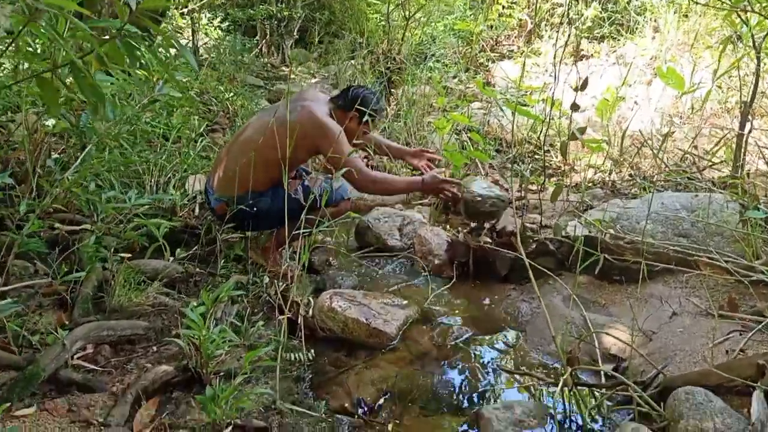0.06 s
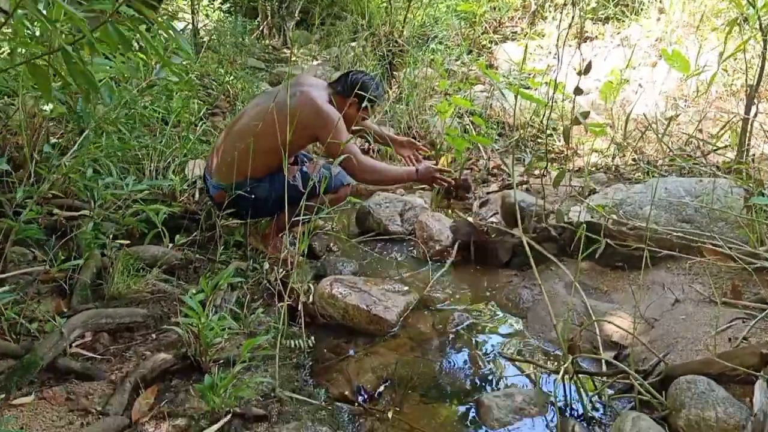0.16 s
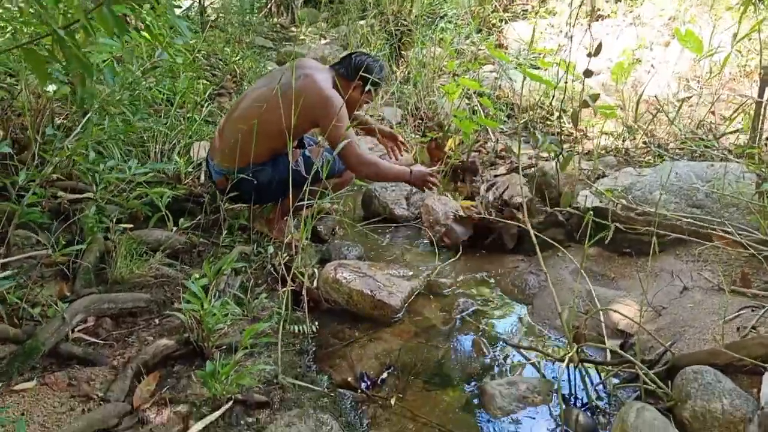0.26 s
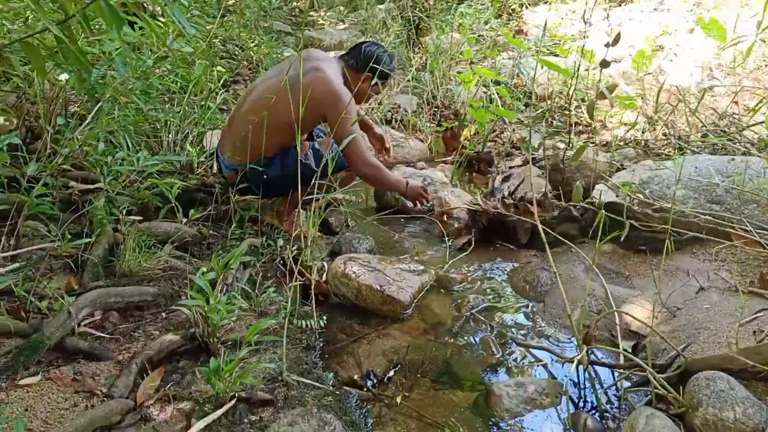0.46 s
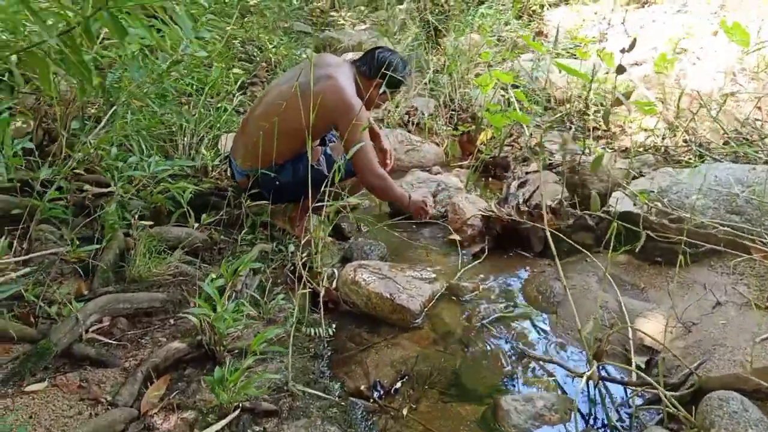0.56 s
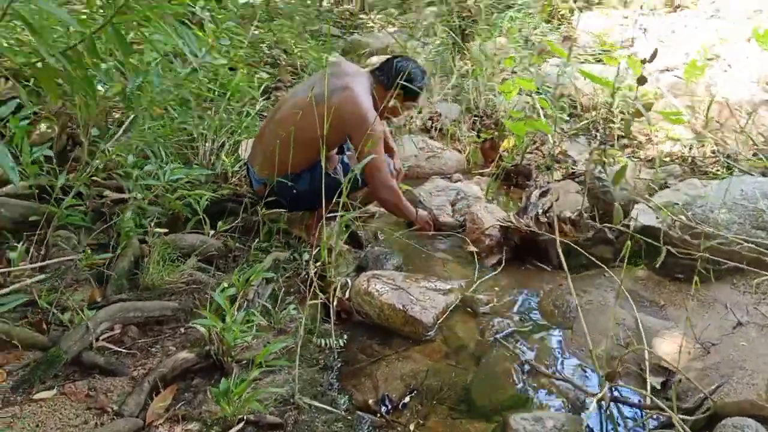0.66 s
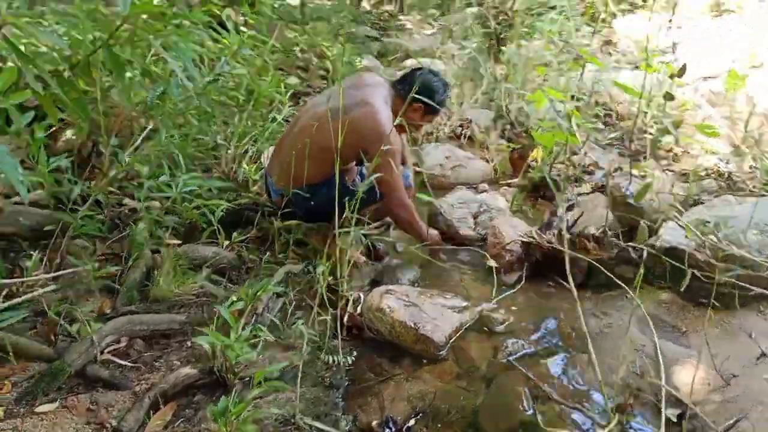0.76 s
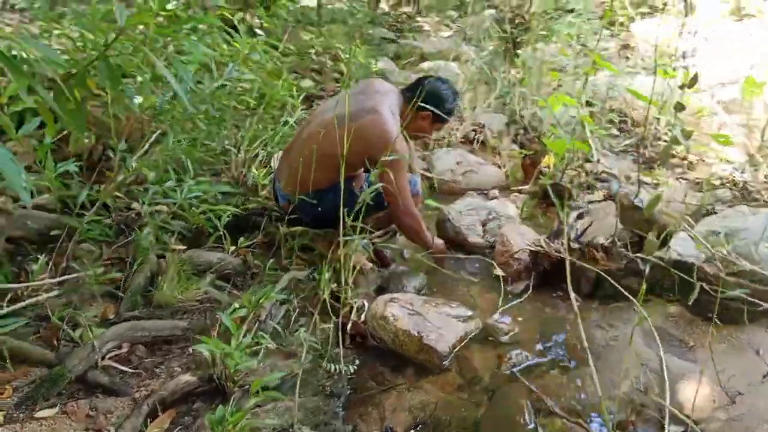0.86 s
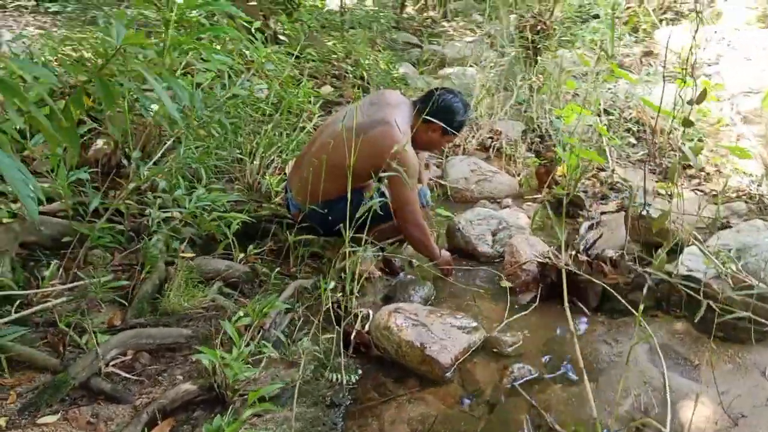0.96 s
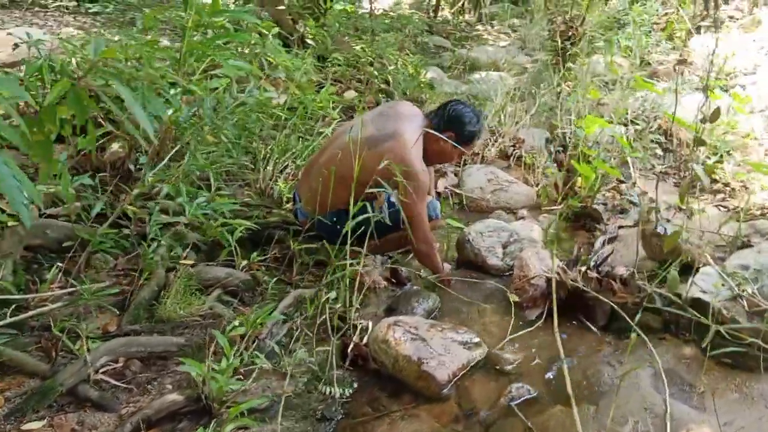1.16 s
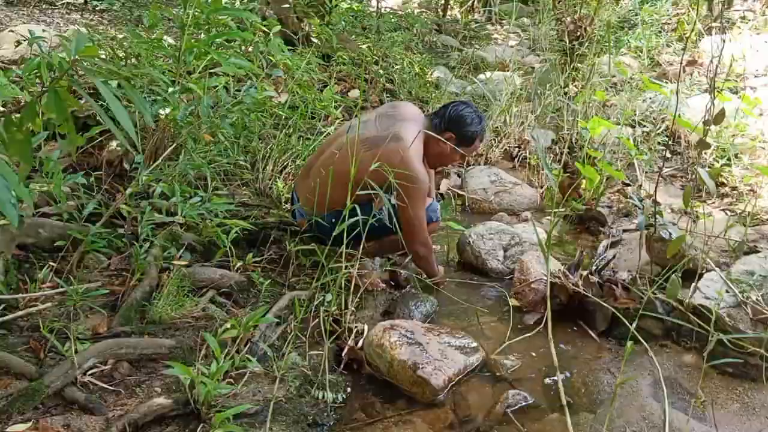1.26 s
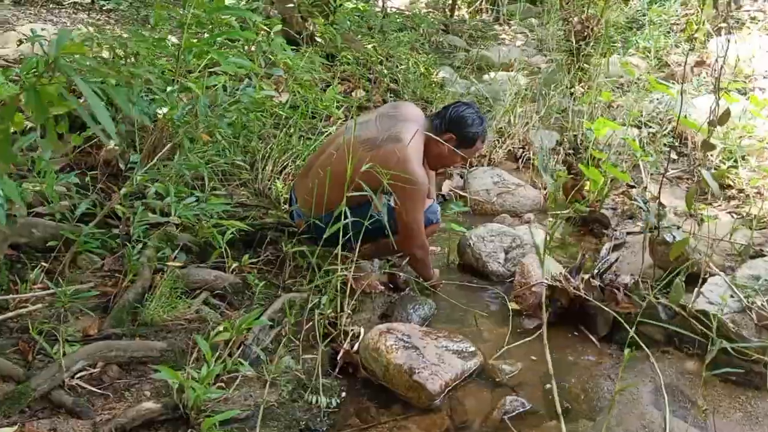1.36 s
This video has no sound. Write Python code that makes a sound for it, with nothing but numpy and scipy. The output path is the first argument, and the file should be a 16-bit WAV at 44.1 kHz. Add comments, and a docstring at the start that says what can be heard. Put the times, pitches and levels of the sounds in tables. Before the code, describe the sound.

Shallow forest stream running softly, with an early hollow stone knock, light ticks and a short splash

```python
"""A small forest stream runs steadily: a low gurgle of bubbles, and the hiss of a riffle off to the left.
Coloured noise makes the rush and short rings that rise in pitch make the bubbles, heard by a stereo pair.
Someone sets a stone down in the shallows: a brief splash of random droplets swells and the stone ticks
against others. It lands with one hollow knock of damped modes and grit, with an early stereo spread;
rocks close by return discrete echoes, and the banks and trees a decaying wash of noise."""
import sys
import numpy as np
from scipy import signal
from scipy.fft import rfft, irfft
from scipy.io import wavfile
from scipy.ndimage import uniform_filter1d

SR = 44100
rng = np.random.default_rng(int(sys.argv[2]) if len(sys.argv) > 2 else 0)


def generate_wav(sig):
    """Save sig (samples, or channels by samples) to the path in sys.argv[1] as 16-bit PCM at SR."""
    pcm = np.round(np.clip(np.atleast_2d(sig).T, -1, 1) * 32767).astype(np.int16)
    wavfile.write(sys.argv[1], SR, pcm)


N = 61739  # samples, 1.4 s

# Spectrum shape of the running water: (frequency [Hz], relative density [dB per Hz])
STREAM_SPECTRUM = [(24, -74), (40, -51), (67, -19.5), (124, -9.5), (207, -4), (239, -6), (277, -2),
                   (321, -4.5), (381, -5.5), (593, -2.5), (1330, -7.5), (2280, -5.5), (3460, -15.5),
                   (5130, -17.5), (8370, -22.5), (11500, -31.5), (14000, -39)]
STREAM_DB, SURGE_DB, FLICKER_DB = -42.5, 0.35, 1.16  # flicker is for the lowest band
# Lean of the water towards the left: (frequency [Hz], left minus right [dB])
LEFT_LEAN = [(60, -1), (110, -0.5), (200, 1), (380, -1), (700, 2.5), (1290, 0.5), (2380, 2.5), (4390, 5),
             (6000, 7), (8500, -5), (15000, 2)]
# Likeness of the two sides for water from all around: (frequency [Hz], correlation [0-1])
SIDE_LIKENESS = [(60, 0.84), (140, 0.88), (290, 0.81), (640, 0.39), (1200, 0)]
RIFFLE_SHARE = 0.31  # part of the rush's power that comes straight from the left
RIFFLE_LEAD_S = 0.0003516  # left before right, about 12 cm of path

# Families of small bubbles in the stream:
# (lowest pitch [Hz], highest pitch [Hz], rate [per s], ring to -60 dB [cycles], family level [dB])
BUBBLE_FAMILIES = [(328.7, 960, 220, 39, -56), (1760, 2890, 560, 23, -54.5), (3160, 7200, 710, 6, -60)]
BUBBLE_GLIDE, BUBBLE_SPREAD_DB = 0.33, 2.2  # glide: fraction the pitch rises over one ring

# Swell of the water's bright band: (time [s], level [dB])
BABBLE_SWELL = [(0, 0.5), (0.101, -0.5), (0.3, 1), (0.7, 1), (0.85, 1.9), (1.04, 2.6), (1.11, -0.5),
                (1.25, -1), (1.33, 0.5)]
BABBLE_HZ, BABBLE_HALF_WIDTH_HZ = 2400, 500

# Spectrum shape of the splash: (frequency [Hz], relative density [dB per Hz])
SPLASH_SPECTRUM = [(300, -32), (700, 1.5), (1400, -3.5), (2100, 5.5), (2900, 2), (3600, 2.5), (4600, -7),
                   (6500, -6.5), (10000, -17), (14000, -21)]
SPLASH_START_S, SPLASH_ATTACK_S, SPLASH_END_S, SPLASH_RELEASE_S = 0.13, 0.038, 0.21, 0.02
SPLASH_DB, DROPS_PER_S = -41.5, 14000  # droplets on each side

# Touches of the stone on others before it lands: (time [s], pitch [Hz], level [dB])
STONE_TICKS = [(0.1328, 2750, -38), (0.1405, 2840, -33), (0.1924, 2520, -27), (0.1949, 2650, -33),
               (0.2014, 2720, -26)]
# Spectrum shape of the gritty edge of each touch: (frequency [Hz], relative density [dB per Hz])
TICK_GRIT_SPECTRUM = [(1500, -25), (2700, 16), (4500, -18), (7000, -25), (12000, -40)]
TICK_T60_S, TICK_GRIT_DB = 0.009, -12.5  # grit level goes on top of the touch's level
TICK_PAN_DB, KNOCK_PAN_DB = 4, 1.3  # left minus right

# Early stereo spread (first row), then echoes from the nearest rocks:
# (delay [s], left gain [signed ratio], right gain [signed ratio])
SPREAD_AND_ECHOES = [(.00101, 0.095, -0.067), (.00231, -0.17, 0.18), (.00433, -0.47, -0.63),
                     (.00525, 0.17, -0.088), (.00631, -0.12, -0.035), (.00738, -.06, -.22),
                     (.0123, 0.031, -0.2), (.0141, -0.23, -0.1)]

# Ringing of the stone and the hollow under it:
# (frequency [Hz], level before the knock's gain [dB], decay to -60 dB [s])
KNOCK_MODES = [(394, -32, 0.013), (572, -20.5, 0.036), (694.4, -24, 0.14), (751, -0.5, 0.01),
               (1320, -20.5, 0.0099)]
KNOCK_S, KNOCK_GAIN_DB, KNOCK_RISE_S = .20825, 11, 0.0014
# How well the cushioned stone radiates its ringing: (frequency [Hz], gain [dB])
STONE_RADIATION = [(40, -17), (90, -21), (160, -4), (300, -4.5), (1250, -3), (1480, -10), (3000, -10)]
# Spectrum shape of grit crushed at the contact: (frequency [Hz], relative density [dB per Hz])
CRUSHED_GRIT_SPECTRUM = [(300, -22), (1400, 12), (2000, 16), (2600, -10), (4000, -19), (12000, -48)]
CRUSHED_GRIT_DB, CRUSHED_GRIT_T60_S = -38, 0.025
# Spectrum shape of the diffuse echo of banks and trees: (frequency [Hz], relative density [dB per Hz])
BANKS_SPECTRUM = [(60, -50), (150, -38), (400, -14), (560, -4), (720, -7), (1000, -20), (1500, -19),
                  (3000, -30), (12000, -62)]
BANKS_DELAY_S, BANKS_T60_S, BANKS_DB = 0.009, 0.064, -31.5  # about 3 m of extra path
FOREST_T60_S, FOREST_DB = 0.35, -38

# Larger bubbles that stand out: (time [s], pitch [Hz], level [dB])
LARGE_BUBBLES = [(0.303, 2070, -38), (0.318, 350, -50), (0.436, 378, -42), (0.445, 142, -42.5),
                 (0.819, 495, -44), (0.882, 305, -41), (1.256, 550, -40), (1.305, 2260, -42),
                 (1.332, 272, -43)]
GURGLE_RISE_S, GURGLE_T60_S, GURGLE_GLIDE = 0.0036, 0.07, 0.14

TOP_HZ = 14100  # the recorder's upper limit
LEFT_RIGHT_SIGN = np.array([[1], [-1]])


def undb(db):
    """Decibels to amplitude gain."""
    return 10 ** (np.asarray(db) / 20)


def unit(x):
    """Scale to rms 1."""
    return x / np.sqrt(np.mean(x ** 2))


def at_hz(table, hz):
    """Read a table on a log-frequency axis."""
    table_hz, value = np.array(table, float).T
    return np.interp(np.log(np.maximum(hz, 1)), np.log(table_hz), value)


def bins():
    """Frequencies of the spectrum in Hz."""
    return np.arange(N // 2 + 1) * SR / N


def equalize(x, table):
    """Filter by a table of gain in dB against frequency."""
    return irfft(rfft(x) * undb(at_hz(table, bins())), N)


def colour(x, table):
    """Give noise a spectrum shape, at rms 1."""
    return unit(equalize(x, table))


def delay(x, seconds):
    """Delay by a phase slope, which allows fractions of a sample."""
    return irfft(rfft(x) * np.exp(-2j * np.pi * bins() * seconds), N)


def since(moment_s):
    """Seconds since a moment, zero before it."""
    return np.maximum(np.arange(N) / SR - moment_s, 0)


def fade(age, t60):
    """Exponential decay by 60 dB in t60 seconds."""
    return np.exp(-np.log(1000) * age / t60)


def rising_ring(age, hz, glide, life):
    """Sine whose pitch rises by the fraction glide over life seconds, as it fades."""
    return np.sin(2 * np.pi * hz * age * (1 + glide * age / life / 2)) * fade(age, life)


def walk(rate):
    """Smooth random wander of rms near 1, from rate random steps per second."""
    k = max(int(SR / rate), 2)
    steps = np.repeat(rng.standard_normal(N // k + 1), k)
    return unit(uniform_filter1d(uniform_filter1d(steps, k), k)[:N])


def from_left(x):
    """A sound from the left reaches the right side a little later."""
    return np.array([x, delay(x, RIFFLE_LEAD_S)])


def lean(x):
    """Tilt the water's sound between left and right, by frequency."""
    return irfft(rfft(x) * undb(LEFT_RIGHT_SIGN * at_hz(LEFT_LEAN, bins()) / 2), N)


def rush(count=20):
    """Countless merged bubbles, all around and from the riffle; the flow surges and each band flickers."""
    mid, side, riffle = rng.standard_normal((3, N))
    alike = at_hz(SIDE_LIKENESS, bins())
    # the mid and side weights set how alike left and right are
    shared = rfft(mid) * np.sqrt((1 + alike) / 2)
    opposed = LEFT_RIGHT_SIGN * rfft(side) * np.sqrt((1 - alike) / 2)
    around = shared + opposed
    water = np.sqrt(1 - RIFFLE_SHARE) * around + np.sqrt(RIFFLE_SHARE) * rfft(from_left(riffle))
    # overlapping triangular bands, evenly spaced in log frequency
    place = np.interp(np.log(bins() + 1), np.log([60, TOP_HZ]), [0, count - 1])
    out = 0
    for k in range(count):
        flicker_db = FLICKER_DB * (1 - k / count / 2) * walk(49.5)  # milder in higher bands
        band = irfft(water * np.maximum(1 - abs(place - k), 0), N)
        out = out + undb(flicker_db) * band
    return colour(out, STREAM_SPECTRUM) * undb(STREAM_DB + SURGE_DB * walk(4.9))


def bubbles(low_hz, high_hz, rate, cycles, db):
    """Single bubbles ring briefly and rise in pitch as they near the surface."""
    out = np.zeros((2, N))
    for when, pitch, size, where in rng.random((int(rate * N / SR), 4)):
        hz = low_hz * (high_hz / low_hz) ** pitch
        start = int(when * N)
        life = cycles / hz
        age = np.arange(min(int(life * SR), N - start)) / SR
        right_lag = RIFFLE_LEAD_S * (where + .5)
        age = np.maximum(age - np.array([[0], [right_lag]]), 0)
        onset = 1 - np.exp(-age * hz)
        loudness = undb(-BUBBLE_SPREAD_DB * np.log(1 - .97 * size))  # a few stand out
        ring = rising_ring(age, hz, BUBBLE_GLIDE, life)
        out[:, start:start + age.shape[1]] += ring * onset * loudness
    return unit(out) * undb(db)


def babble(water):
    """The bright band of the running water swells and sinks."""
    band = irfft(rfft(water) / (1 + ((bins() - BABBLE_HZ) / BABBLE_HALF_WIDTH_HZ) ** 4), N)
    swell_db = np.interp(np.arange(N) / SR, *np.array(BABBLE_SWELL).T)
    return water + band * (undb(swell_db) - 1)


def splash():
    """Spray thickens as the stone pushes into the water and dies as it lands."""
    attack = np.sqrt(np.minimum(since(SPLASH_START_S) / SPLASH_ATTACK_S, 1))
    release = np.exp(-since(SPLASH_END_S) / SPLASH_RELEASE_S)
    drops = rng.standard_normal((2, N)) * (rng.random((2, N)) < DROPS_PER_S / SR)
    return colour(drops, SPLASH_SPECTRUM) * attack * release * undb(SPLASH_DB)


def at_the_stone(x, pan_db):
    """A sound at the stone, with its early stereo spread and then the echoes from the nearest rocks."""
    returns = sum(np.array([[left], [right]]) * delay(x, s) for s, left, right in SPREAD_AND_ECHOES)
    return (x + returns) * undb(LEFT_RIGHT_SIGN * pan_db / 2)


def ticks():
    """The stone grazes its neighbours on the way down: each touch is a short ring with a gritty edge."""
    out = 0
    for s, hz, db in STONE_TICKS:
        age = since(s)
        grit = undb(TICK_GRIT_DB) * colour(rng.standard_normal(N), TICK_GRIT_SPECTRUM)
        touch = np.sin(2 * np.pi * hz * age) + grit
        out = out + undb(db) * touch * fade(age, TICK_T60_S) * (1 - np.exp(-age * hz))
    return at_the_stone(out, TICK_PAN_DB)


def soft_push(age):
    """A cushioned contact builds up smoothly from zero."""
    return 1 - np.exp(-(age / KNOCK_RISE_S) ** 2)


def knock():
    """A cushioned blow rings heavily damped modes and crushes a little grit; the nearby rocks answer."""
    age = since(KNOCK_S)
    ring = 0
    for hz, db, t60 in KNOCK_MODES:
        ring = ring + undb(db + KNOCK_GAIN_DB) * np.sin(2 * np.pi * hz * age) * fade(age, t60)
    grit = undb(CRUSHED_GRIT_DB) * colour(rng.standard_normal(N), CRUSHED_GRIT_SPECTRUM)
    grit = grit * soft_push(age) * fade(age, CRUSHED_GRIT_T60_S)
    blow = equalize(soft_push(age) * ring, STONE_RADIATION) + grit
    return at_the_stone(blow, KNOCK_PAN_DB)


def banks_and_trees():
    """Banks and trees scatter the knock into diffuse noise with a short and a long decay."""
    age = since(KNOCK_S + BANKS_DELAY_S)
    scatter = colour(rng.standard_normal((2, N)), BANKS_SPECTRUM)
    banks = undb(BANKS_DB) * fade(age, BANKS_T60_S)
    forest = undb(FOREST_DB) * fade(age, FOREST_T60_S)
    return scatter * soft_push(age) * (banks + forest)


def gurgles():
    """The larger bubbles stand out of the stream one by one, each rising a little in pitch."""
    out = 0
    for s, hz, db in LARGE_BUBBLES:
        age = since(s)
        onset = 1 - np.exp(-age / GURGLE_RISE_S)
        out = out + undb(db) * rising_ring(age, hz, GURGLE_GLIDE, GURGLE_T60_S) * onset
    return from_left(out)


def scene():
    """The stream, splash and larger bubbles lean as water does; the stone keeps its own place."""
    stream = babble(rush()) + sum(bubbles(*family) for family in BUBBLE_FAMILIES)
    water = lean(stream + splash() + gurgles())
    stone = ticks() + knock() + banks_and_trees()
    return water + stone


def record(dry):
    """The recorder cuts the top with a steep low-pass."""
    return signal.sosfilt(signal.ellip(10, .2, 80, TOP_HZ, fs=SR, output="sos"), dry)


dry = scene()
out = record(dry)
generate_wav(out)
```